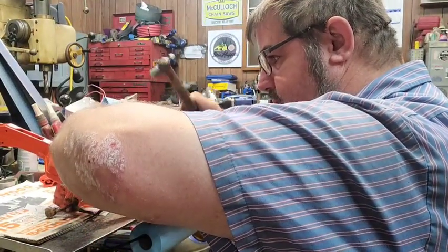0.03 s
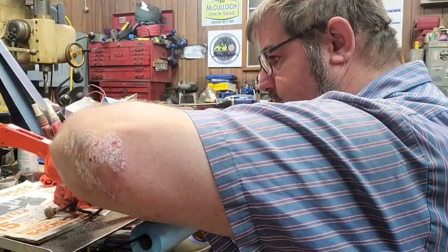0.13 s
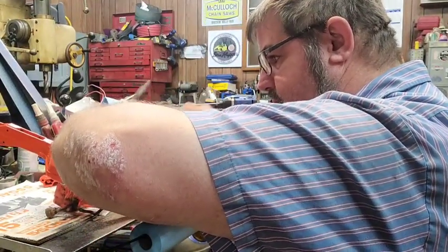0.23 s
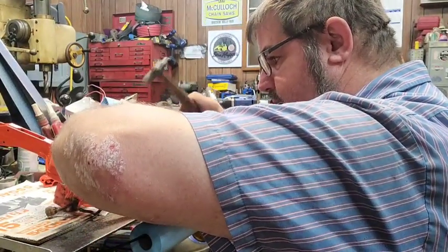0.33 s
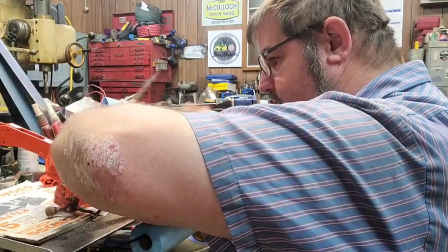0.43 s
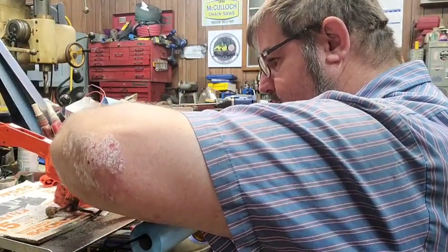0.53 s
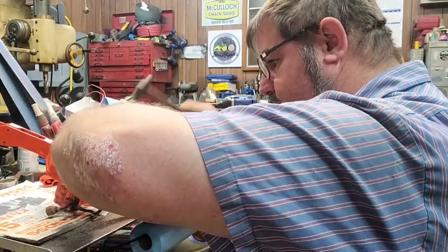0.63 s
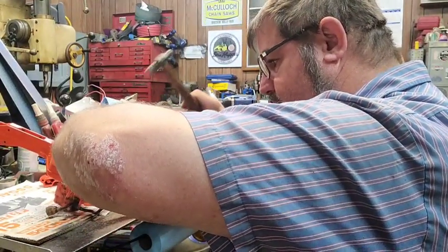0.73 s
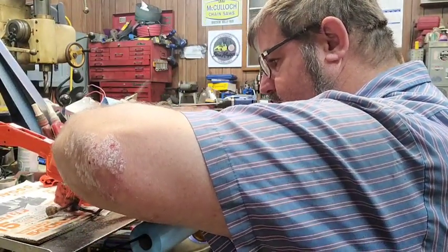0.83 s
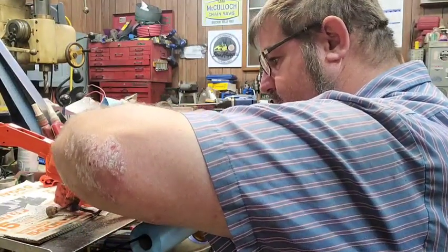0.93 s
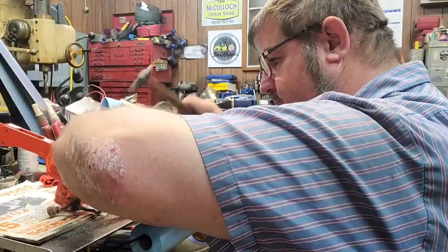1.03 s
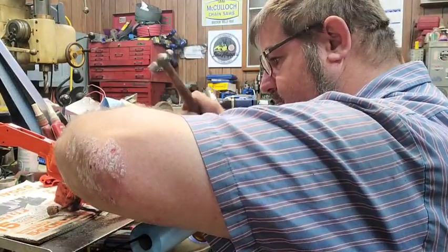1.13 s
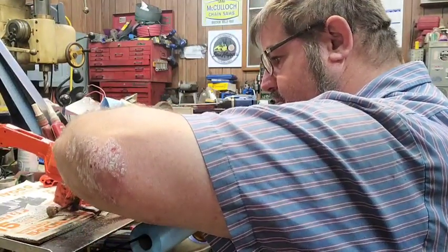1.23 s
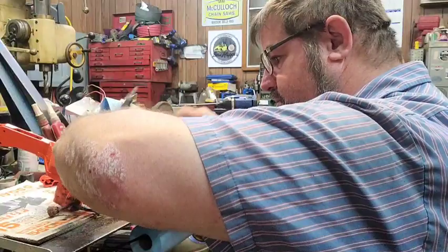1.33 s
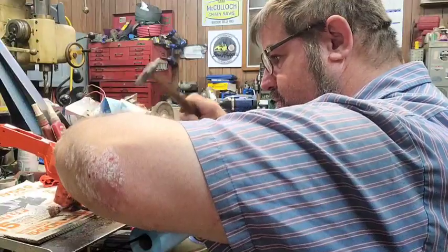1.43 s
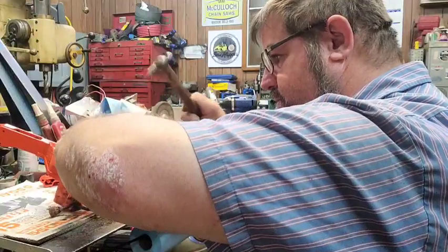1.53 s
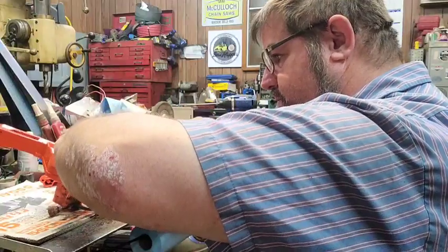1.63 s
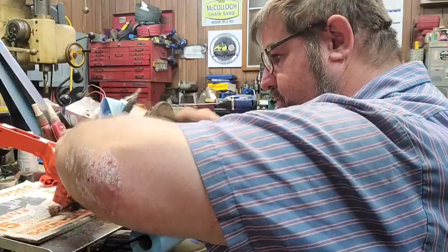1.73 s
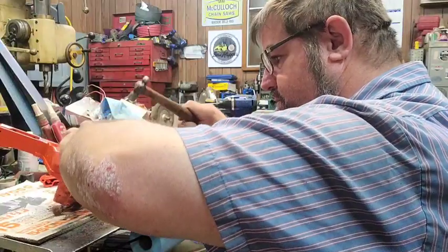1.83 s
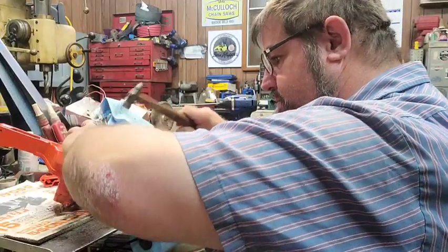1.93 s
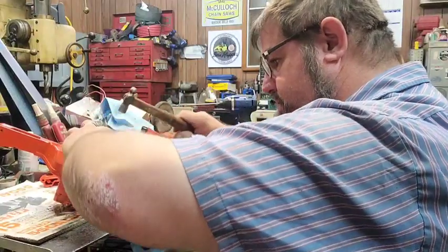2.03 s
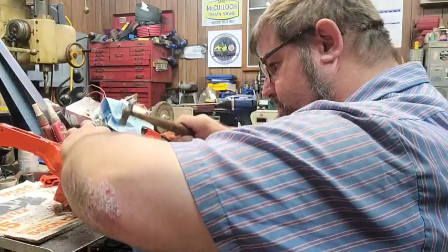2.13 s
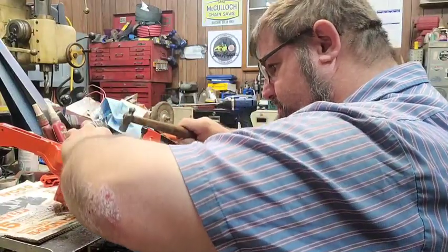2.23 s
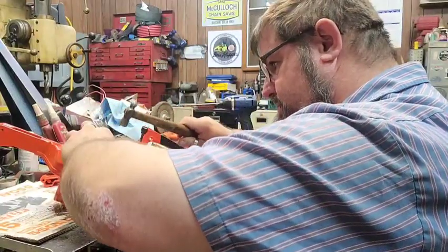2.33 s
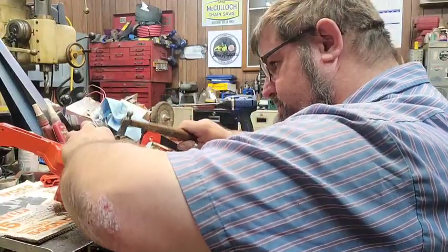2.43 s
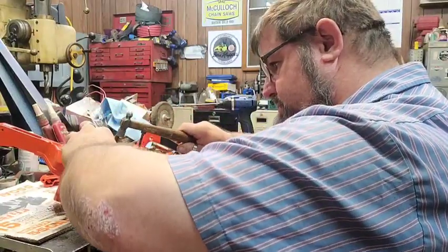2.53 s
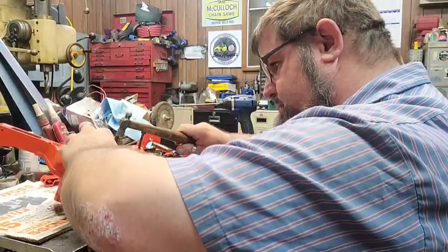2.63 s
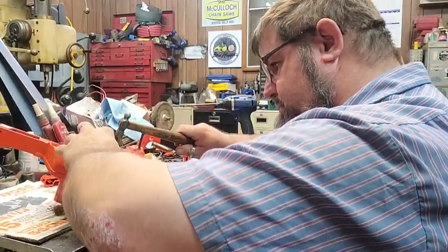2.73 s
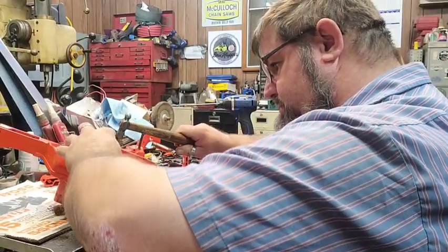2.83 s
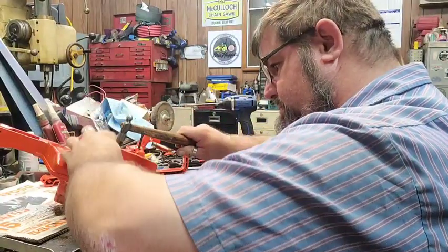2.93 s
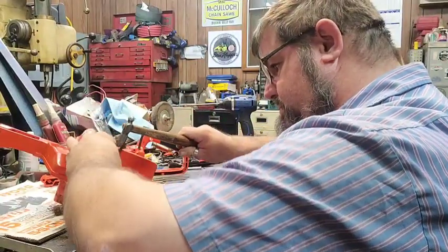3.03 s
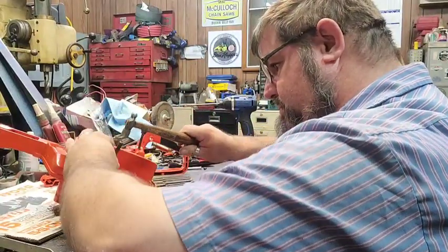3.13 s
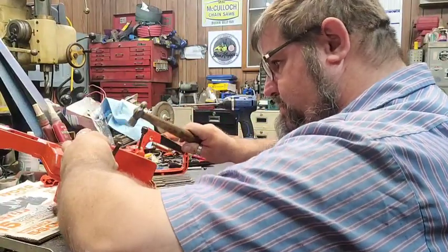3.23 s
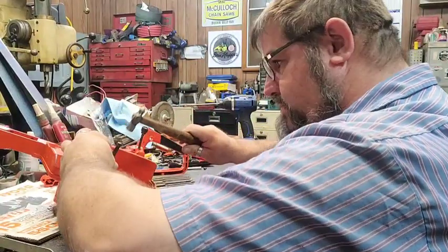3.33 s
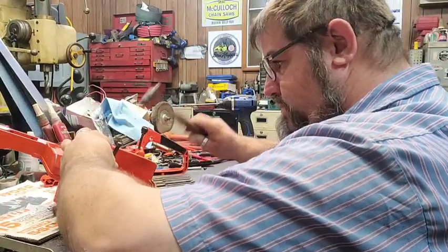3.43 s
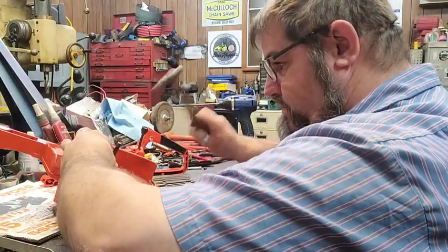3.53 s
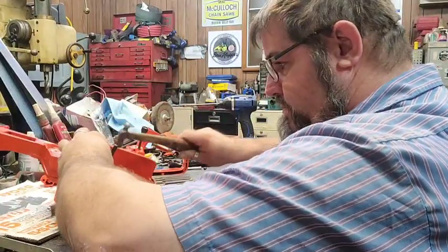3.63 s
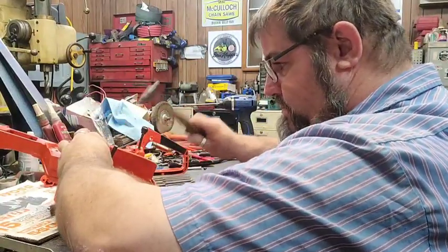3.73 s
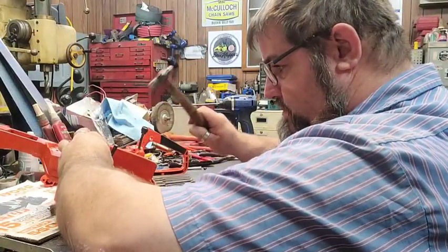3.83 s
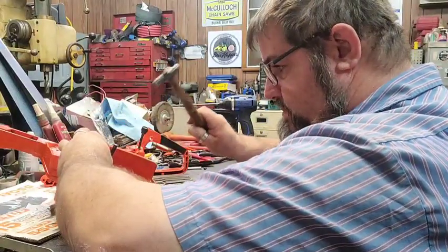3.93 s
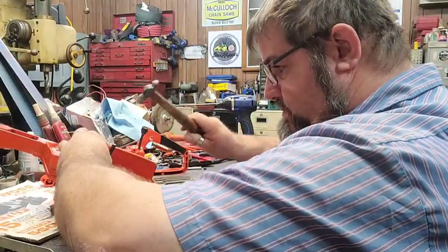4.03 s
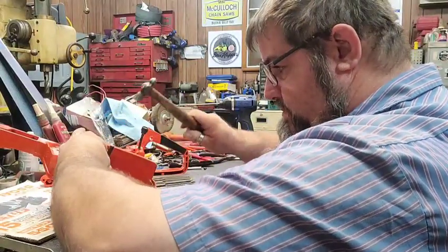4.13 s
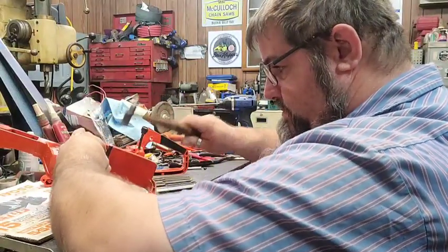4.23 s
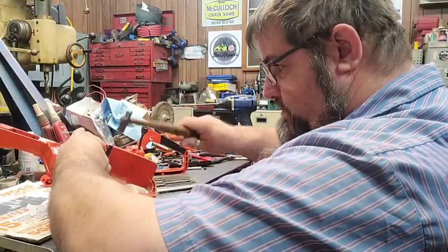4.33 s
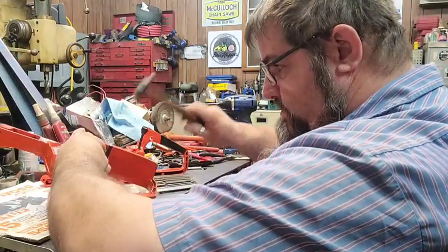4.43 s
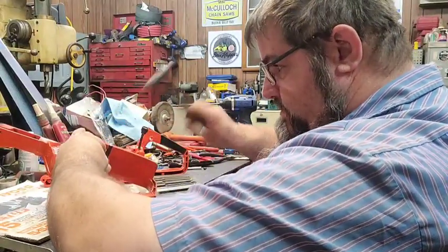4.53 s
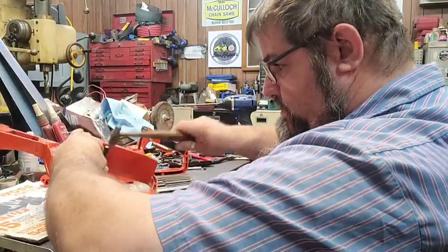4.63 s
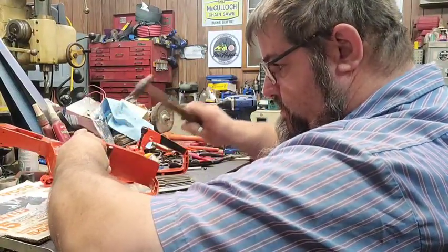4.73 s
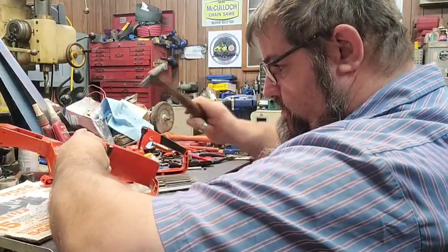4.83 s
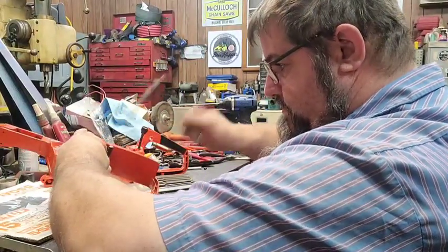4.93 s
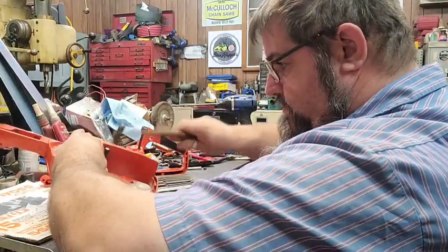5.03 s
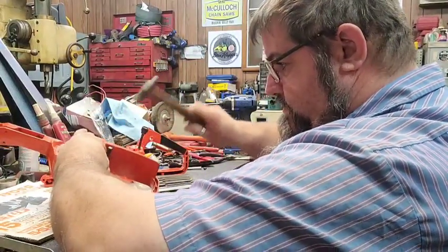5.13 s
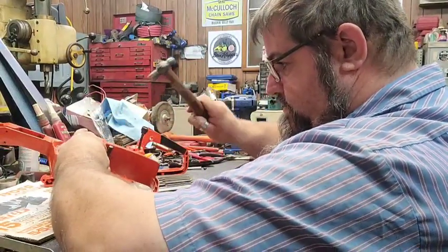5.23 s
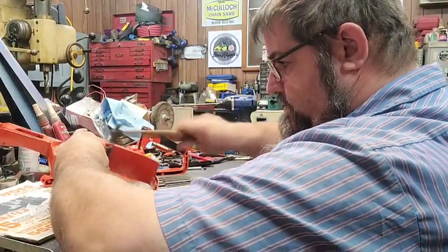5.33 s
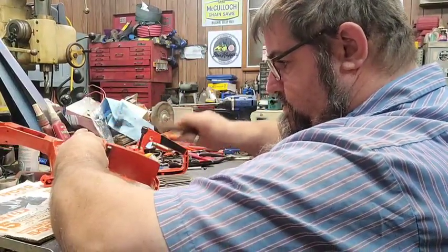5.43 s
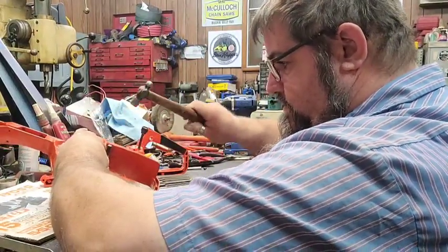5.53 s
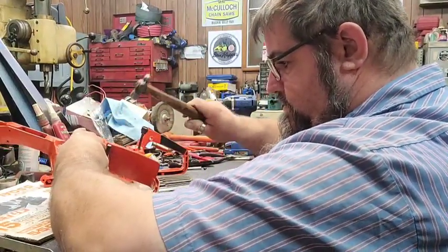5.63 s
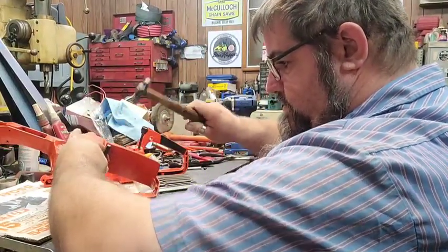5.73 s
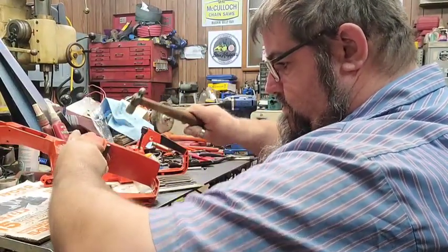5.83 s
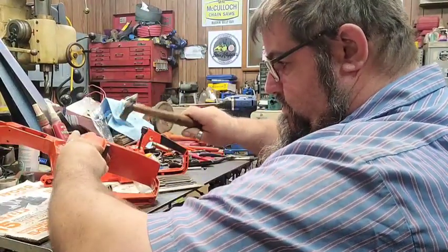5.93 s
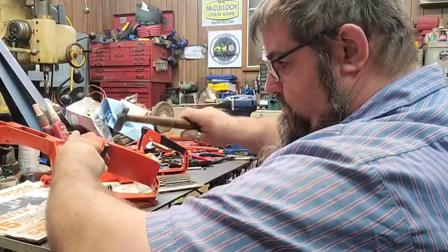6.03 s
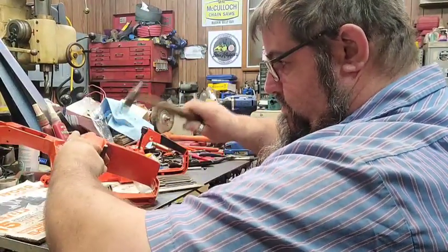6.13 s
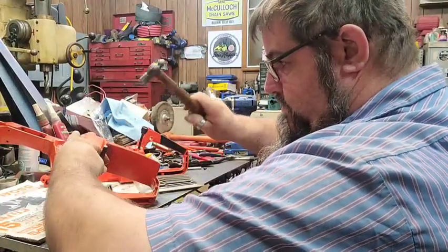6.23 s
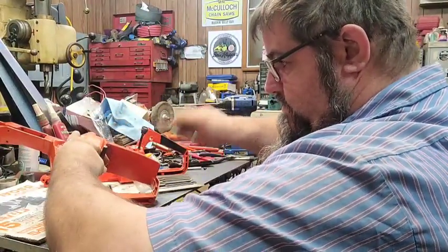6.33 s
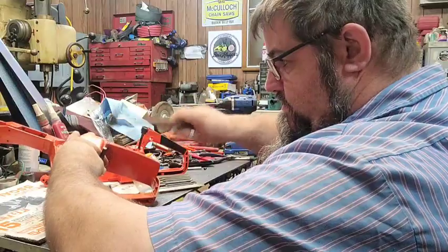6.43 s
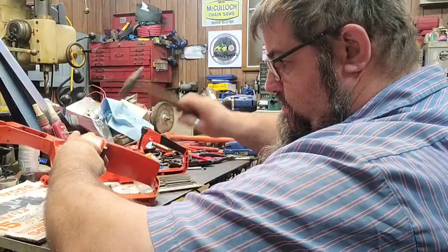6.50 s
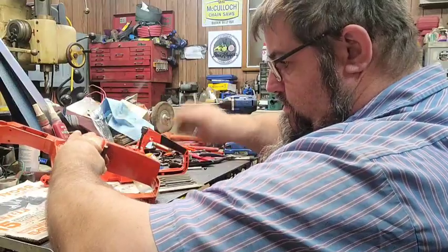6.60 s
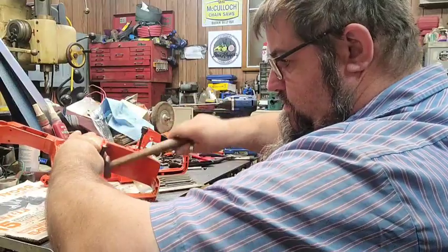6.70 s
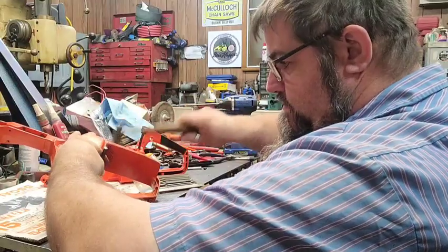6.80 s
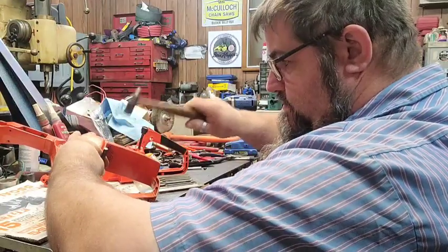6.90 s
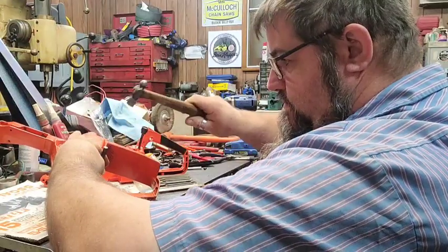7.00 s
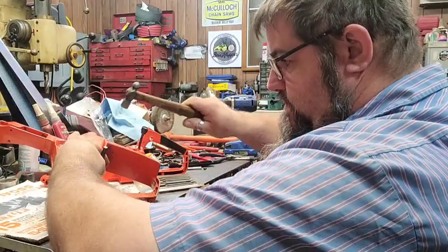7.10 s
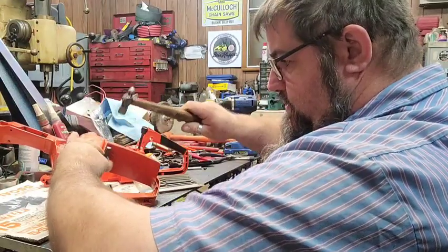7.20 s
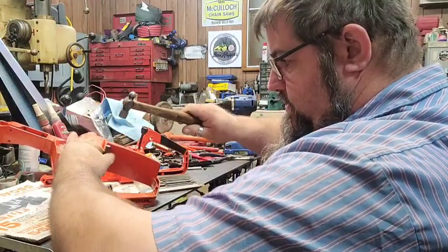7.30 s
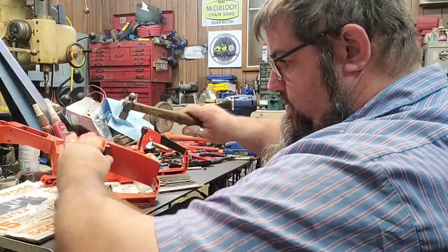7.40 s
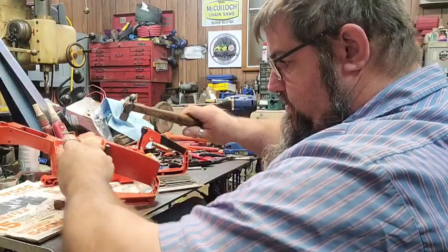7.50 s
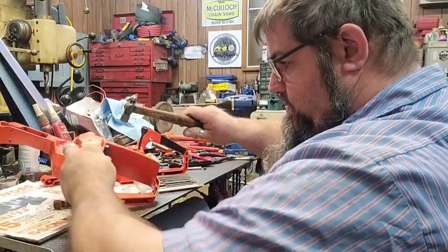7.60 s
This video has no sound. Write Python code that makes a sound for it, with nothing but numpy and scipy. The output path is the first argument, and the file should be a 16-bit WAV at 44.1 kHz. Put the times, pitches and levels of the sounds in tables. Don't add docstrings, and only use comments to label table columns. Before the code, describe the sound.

Sharp steel-on-steel cracks with a high short ring and slight wooden bench thump, roughly three per second at first, then softer positioning taps, a single hard strike and a slower final run. A plastic handle bounces dully after blows. The last hit leads to a harsh scrape and crack, a little metallic chime, then faint rattles and a joint click. Stereo phone nearby, indoor workshop with a third-second echo, soft hiss and distant machine rumble.

```python
import sys
import numpy as np
from scipy import signal
from scipy.fft import rfft, irfft, next_fast_len
from scipy.io import wavfile
from scipy.ndimage import uniform_filter1d

SR = 44100
rng = np.random.default_rng(int(sys.argv[2]) if len(sys.argv) > 2 else 0)


def invert_db(level):
    return 10 ** (np.asarray(level, dtype=float) / 20)


def digitize_waveform(pressure):
    field = np.atleast_2d(pressure).T
    bounded = np.clip(field, -1, 1)
    quanta = np.round(bounded * 32767).astype(np.int16)
    wavfile.write(sys.argv[1], SR, quanta)


N = 337894
LEAD = SR // 2


def on_log(hz, table):
    table_hz, value = np.transpose(table)
    return np.interp(np.log(np.maximum(hz, 1)), np.log(table_hz), value)


def unit(x):
    return x / np.abs(x).max()


def fade(size, t60):
    return np.exp(-np.log(1000) * np.arange(size) / SR / max(t60, 1 / SR))


def filtered(x, gain):
    size = next_fast_len(x.shape[-1])
    x_long = np.take(x, np.arange(size), axis=-1, mode="wrap")
    spectrum = rfft(x_long) * gain(np.fft.rfftfreq(size, 1 / SR))
    return irfft(spectrum, size)[..., :x.shape[-1]]


def noise(size, gain):
    return filtered(rng.standard_normal(size), gain)


def bump(hz, width_oct):
    return lambda f: np.exp(-.5 * (np.log2(np.maximum(f, 1) / hz) / width_oct) ** 2)


def ring(modes, size, scatter_db, detune):
    hz, db, t60 = np.transpose(modes)
    size_chance, pitch_chance, sign_chance = rng.standard_normal((3, len(hz)))
    t = np.arange(size)[:, None] / SR
    waves = np.sin(2 * np.pi * hz * (1 + detune * pitch_chance) * t) * np.exp(-np.log(1000) * t / t60)
    return unit(waves @ (invert_db(db + scatter_db * size_chance) * np.sign(sign_chance)))


def burst(size, t60, rise_s, gain):
    spectrum = rfft(rng.standard_normal(size) * fade(size, t60) * (1 - fade(size, rise_s)))
    even = spectrum / np.sqrt(uniform_filter1d(np.abs(spectrum) ** 2, size // 400))
    return unit(filtered(irfft(even, size), gain) * fade(size, 4 * t60))


def pair(size, hz, width_oct, alike):
    mid, side = noise(size, bump(hz, width_oct)), noise(size, bump(hz, width_oct))
    c = np.clip(alike, -.99, .99)
    return np.sqrt(1 + c) * mid + np.sqrt(1 - c) * side * np.array([[1], [-1]])


def add(paths, s, sound, direct_db):
    i = int(round(s * SR)) + LEAD
    sound = sound[:paths.shape[1] - i]
    paths[:, i:i + len(sound)] += sound * invert_db([[0], [-direct_db]])


# hz, level_db (per Hz)
AIR = [(15, -54), (25, -25), (37, -19), (59, 1.5), (87, -8.5), (206, -24), (242, -18), (270, -21.5),
       (476, -28), (516, -36), (591, -27), (641, -31.5), (1440, -30.5), (16000, -51.5)]
# hz, likeness (-1 to 1)
AIR_ALIKE = [(30, 0.88), (60, 0.84), (130, .75), (300, 0.18), (640, 0.14), (1400, 0.045), (16000, .01)]
# hz, left_minus_right_db
AIR_LEAN = [(30, 9), (60, -1), (150, 2), (16000, -0.5)]
# pitch_hz, rms_db
HUM = [(120, -79.5), (240, -84.5), (360, -100.5), (480, -91), (600, -99), (720, -98)]
# middle_s, half_length_s, treble_swell_db
SLEEVE = [(1.2, .7, 5), (3.3, .3, 3.5), (4.45, .45, 7.5), (7.2, 0.6, 7)]


def air():
    out, t = 0, np.arange(N) / SR
    treble_db = -5 + sum(db * np.exp(-((t - s) / half_s) ** 2) for s, half_s, db in SLEEVE)
    for hz in 28 * 2 ** np.arange(0, 9.3, 1 / 3):
        steps = np.repeat(rng.standard_normal(N // 4096 + 1), 4096)[:N]
        flicker_db = 0.4 * uniform_filter1d(steps, 4096)
        lean_db = on_log(hz, AIR_LEAN) * np.array([[.5], [-.5]])
        db = on_log(hz, AIR) + flicker_db + lean_db + treble_db * (hz > 700)
        out = out + invert_db(db) * pair(N, hz, 0.24, on_log(hz, AIR_ALIKE))
    hum = sum(np.sqrt(2) * invert_db(db) * np.sin(2 * np.pi * (hz * t + rng.random())) for hz, db in HUM)
    return out * invert_db(-67) / out.std() + hum


# hz, level_db (per Hz)
CRACK = [(35, -57.5), (60, -27.5), (128, -28.5), (637, -19.5), (806, -20.5), (1020, -18), (3490, 0.5),
         (4120, 7.5), (6760, -4.5), (8160, 1.5), (9410, -4.5), (15100, -1.5), (17000, -45.5)]
# pitch_hz, level_db, t60_s
PUNCH = [(3962, -5, .04), (4040, -3, .05), (4095, 0, .06), (4180, -3, .05), (4340, -5, .04),
         (4640, -8, .04)]
HEAD = [(5265, -4, .03), (5665, 0, .045), (6000, -4, .02), (6700, -10, .02)]
FACE = [(7650, -0.5, 0.097), (8420, 7, 0.03), (8530, -5.5, 0.015), (8360, -5.5, 0.055)]
TIP = [(13400, -8, .015), (14650, -5, .015), (15050, -3, .02), (15450, 0, .025)]
BENCH = [(415.5, -15, .08), (642, -5.5, 0.14), (1040, -7, 0.14), (1200, -0.5, 0.16), (1710, -5, 0.1),
         (1850, -3, 0.042), (2930, -6, .1), (3691, -7, 0.059)]
LEGS = [(113, -9.5, .1), (135, -3.5, 0.2), (286, -13.5, 0.24)]


def blow(db, ring_db, thump_db, top_db, face_db, after_db, size=SR):
    colour = lambda f: invert_db(on_log(f, CRACK))
    bright = lambda f: 1 / (1 + (9000 / np.maximum(f, 1)) ** 12)
    low = lambda f: 1 / (1 + (f / 2000) ** 4)
    deep = lambda f: 1 / (1 + (f / 330) ** 4)
    crack = burst(size, 0.019, 0.0051, lambda f: colour(f) * (1 - bright(f)) * (1 - low(f)))
    sizzle = burst(size, 0.009, .002, lambda f: colour(f) * bright(f))
    sizzle = sizzle + invert_db(-2.5) * ring(TIP, size, scatter_db=3.0, detune=0.0017)

    steel = ring(PUNCH, size, scatter_db=0.0, detune=0.00079)
    head = invert_db(-14.5) * ring(HEAD, size, scatter_db=9.5, detune=.003)
    face = invert_db(face_db - 3.0) * ring(FACE, size, scatter_db=-2.0, detune=0.0031)
    afterring = unit(noise(size, bump(4080, width_oct=.014))) * fade(size, t60=.75)

    thud = burst(size, 0.092, 0.0017, lambda f: colour(f) * low(f) * (1 - deep(f)))
    planks = ring(BENCH, size, scatter_db=2.5, detune=0.008)
    wood = invert_db(3.0) * thud + invert_db(-5.5) * planks
    boom = burst(size, 0.27, .006, lambda f: colour(f) * deep(f))
    boom = boom + invert_db(-5) * ring(LEGS, size, scatter_db=-1.0, detune=.02)
    legs = invert_db(-30.5 + 0.2 * db) * boom

    metal = invert_db(-3) * crack + invert_db(top_db - 3.5) * sizzle + invert_db(ring_db + 2) * steel + head + face
    whole = metal + invert_db(after_db) * afterring + invert_db(thump_db + 6.5) * wood + legs
    dulled = lambda f: (1 + (f / 5000) ** 2) ** (.024 * db)
    return invert_db(db) * filtered(whole, dulled) * np.linspace(1, 0, size)


# start_s, crack_peak_db, then against it punch_ring_db, face_ring_db, afterring_db
EARLIER_BLOW = [
    (-.13, -15.5, -6, -9.5, -32),
]
BLOWS = [
    (0.2401, -7.5, -17, -10.5, -37.5),
    (0.5886, -7.5, -24, -13, -39),
    (0.9737, -7.5, -14.5, -16, -36),
    (1.3396, -8, -8.5, -17, -31),
    (1.6968, -7.5, -14.5, -10.5, -41),
    (3.7112, -6.5, -14.5, -24.5, -42.5),
    (4.7022, -7, -14, -11.5, -38.5),
    (5.0765, -6.5, -10.5, -16, -37.5),
    (5.448, -7, -6, -28.5, -40),
    (6.4273, -7, -12.5, -9.5, -41),
]
TAPS = [
    (2.547, -18, -14, -28, -52),
    (2.979, -29.5, -15, -40, -52),
]


def hammering(paths):
    for s, db, ring_db, face_db, after_db in [*EARLIER_BLOW, *BLOWS, *TAPS]:
        sizzle_db = -3.5 + .42 * db + 4.5 * (s < 2.2)
        thump_db = -25 + .016 * db ** 2
        sound = blow(db, ring_db, thump_db, sizzle_db, face_db, after_db)
        add(paths, s, invert_db(3.5) * sound, direct_db=2 - .38 * db)


# hz, t60_s
ROOM_T60 = [(60, 0.37), (160, 0.26), (420, 0.42), (1100, 0.29), (2900, 0.39), (7700, 0.3), (16000, 0.3)]
# hz, likeness (-1 to 1)
ROOM_ALIKE = [(50, .6), (110, .97), (300, .9), (640, .6), (1400, .2), (3100, -.3), (7000, 0.01),
              (16000, .05)]


def workshop(size=SR // 2 + SR // 4):
    tail = 0
    for hz in 45 * 2 ** np.arange(0, 9, .5):
        tail = tail + pair(size, hz, 0.31, on_log(hz, ROOM_ALIKE)) * fade(size, on_log(hz, ROOM_T60))
    slaps = np.repeat(rng.standard_normal(size // 64 + 1), 64)[:size]
    lumps = invert_db(6 * slaps * fade(size, t60=.7))
    spectrum = rfft(tail * lumps * (1 - fade(size, t60=0.029)))
    power = np.abs(spectrum) ** 2 + 1e-18
    even = uniform_filter1d(power.mean(axis=0), size=450) / uniform_filter1d(power, size=30, axis=1)
    return irfft(spectrum * np.sqrt(even), size)[:, :size * 4 // 5]


# pitch_hz, level_db, t60_s
HANDLE = [(760, 0, .035), (1070, -3, .03), (1230, 0, .035), (1450, -2, .03), (1680, -1, .035),
          (1900, -3, .03)]


def knock(hz, tick_db, hollow_db, scrape_t60, steep, size=SR // 4):
    body = lambda f: (f / hz) ** steep / (1 + (f / (1.15 * hz)) ** (steep + 5))
    dull = burst(size, scrape_t60, 0.004, body)
    notes = unit(filtered(ring(HANDLE, size, scatter_db=3, detune=.03), body) * fade(size, t60=.1))
    hollow = burst(size, 0.049, 0.009, bump(340, width_oct=0.54))
    thin = lambda f: bump(3800, width_oct=.08)(f) + invert_db(-6) * bump(4200, width_oct=.5)(f)
    tick = burst(size, 0.075, 0.0018, thin)
    soft = 1 - fade(size, t60=.004)
    return (invert_db(-5) * dull + invert_db(-6.5) * notes + invert_db(tick_db) * tick + invert_db(hollow_db) * hollow) * soft


# start_s, peak_db, top_note_hz
REBOUNDS = [(0.699, -39, 1630), (0.786, -44, 1010), (1.099, -47, 1860), (1.748, -29, 1980),
            (1.863, -35, 1270), (1.959, -48, 1620), (3.779, -36, 700), (4.81, -22.5, 1600),
            (5.189, -23.5, 1740), (5.549, -29, 1620), (6.779, -31, 1315), (6.944, -44, 1750)]
THUDS = [
    (2.11, -57.5, 750),
    (3.466, -58, 770),
    (3.597, -62, 780),
    (7.42, -60, 1040),
]
NUDGES = [
    (2.721, -38.5, 1576),
    (2.75, -60, 1720),
    (2.888, -50, 1620),
    (2.912, -46, 1240),
    (3.049, -39.5, 1275),
    (3.122, -43, 1610),
    (3.157, -57, 1646),
    (7.492, -39, 1570),
]
RATTLES = [
    (7.264, -44.5, 1800),
    (7.277, -46.5, 1810),
    (7.291, -53.5, 1870),
    (7.348, -50, 1910),
    (7.388, -47.5, 1840),
]


def knocks(paths):
    rebound = dict(tick_db=-11, hollow_db=-19.5, scrape_t60=0.0126, steep=2)
    thud = dict(tick_db=-21, hollow_db=-4.5, scrape_t60=0, steep=2.7)
    nudge = dict(tick_db=-22, hollow_db=-29, scrape_t60=0, steep=2.1)
    rattle = dict(tick_db=-7.5, hollow_db=-22, scrape_t60=0.01, steep=2)
    kinds = [(REBOUNDS, rebound, 8.5), (THUDS, thud, 5), (NUDGES, nudge, 4), (RATTLES, rattle, 3.5)]
    for events, kind, direct_db in kinds:
        for s, db, hz in events:
            add(paths, s, invert_db(db + 6.0) * knock(hz, **kind), direct_db)


# start_s, peak_db, straight_against_echoes_db, pitch_hz
SCRATCH = [
    (4.697, -25.5, 17, 8410),
    (7.6255, -39.5, 4.5, 5460),
]


def scratches(paths):
    for s, db, direct_db, hz in SCRATCH:
        add(paths, s, invert_db(db) * burst(SR // 2, 0.019, 0.00081, bump(hz, width_oct=0.54)), direct_db)


# start_s, peak_db, straight_against_echoes_db
SLIPS = [
    (6.7339, -18, 14),
    (6.744, -8.5, 15.5),
]
# hz, level_db (per Hz)
SLIP_COLOUR = [(88, -55.5), (150, -29), (783, -15), (972, -17.5), (1620, -3), (2450, -10), (2810, 2.5),
               (6290, -9), (9510, -16), (14400, -12.5), (16500, -16.5)]


def slips(paths):
    colour = lambda f: invert_db(on_log(f, SLIP_COLOUR))
    for s, db, direct_db in SLIPS:
        add(paths, s, invert_db(db + 0.5) * burst(SR // 2, 0.059, 0.0041, colour), direct_db)


# start_s, peak_db, straight_against_echoes_db
PIN_DROP = [
    (6.876, -18, 30),
]
# pitch_hz, level_db, t60_s
PIN = [(2840, -2, .03), (2990, 0, .03), (4170, -2, .03), (4400, -5, .025), (7670, -28, .14),
       (15490, -26, .07)]


def pin_drop(paths, size=SR // 2):
    for s, db, direct_db in PIN_DROP:
        chime = ring(PIN, size, scatter_db=0, detune=0)
        click = burst(size, .012, .0005, bump(3500, width_oct=.45))
        add(paths, s, invert_db(db) * (invert_db(-2) * chime + click), direct_db)


# start_s, peak_db, straight_against_echoes_db
SNAPS = [
    (7.5078, -38, 18),
    (7.572, -48, 16),
]


def snaps(paths, size=SR // 8):
    t = np.arange(size) / SR
    push = -unit(t * np.exp(-t / .00016))
    for s, db, direct_db in SNAPS:
        shudder = invert_db(-12.5) * burst(size, 0.06, .002, bump(350, width_oct=0.76))
        add(paths, s, invert_db(db) * (push + shudder), direct_db)


# hz, left_minus_right_db
SHADE = [(60, 2), (110, -2), (200, -2), (380, 1), (700, -1.5), (1290, -1), (2380, -0.5), (4400, -2.5),
         (8120, 3.5), (15000, 8.5)]


def phone_ports(paths):
    straight = np.array([np.roll(paths[0], 6), paths[0]])
    echoes = signal.fftconvolve(paths[1:], workshop(), axes=1)[:, :N + LEAD]
    shade = lambda f: invert_db(on_log(f, SHADE) * np.array([[.5], [-.5]]))
    return filtered(straight + invert_db(-27.5) * echoes, shade)


def scene():
    paths = np.zeros((2, N + LEAD))
    for source in (hammering, knocks, scratches, slips, pin_drop, snaps):
        source(paths)
    return phone_ports(paths)[:, LEAD:] + air()


def early_smear(held):
    smear = rng.standard_normal((2, 2048)) * fade(2048, t60=0.089) * np.hanning(4096)[2048:]
    ahead = signal.fftconvolve(held[:, ::-1], smear, axes=1)[:, :N][:, ::-1]
    now, soon = (uniform_filter1d(v ** 2, 128, axis=1) for v in (held, ahead))
    rising = np.clip(1 - invert_db(15.5) * now / (soon + 1e-18), 0, 1)
    coarse = np.maximum(soon, 0) ** .2
    return invert_db(-29.5) * ahead * rising * coarse


def roll_off(x):
    return signal.sosfilt(signal.butter(12, 17130, fs=SR, output="sos"), x)


def record(dry):
    held = filtered(dry, lambda f: 1 / (1 + (f / 15900) ** 80))
    mix = held + early_smear(held)
    return roll_off(mix)


dry = scene()
out = record(dry)
digitize_waveform(out)
```